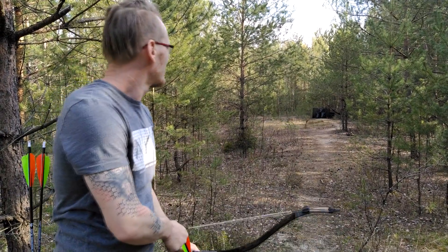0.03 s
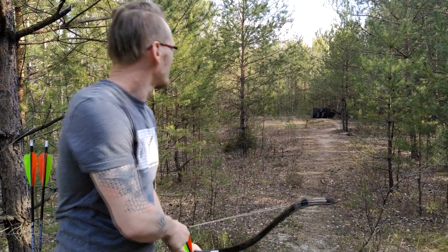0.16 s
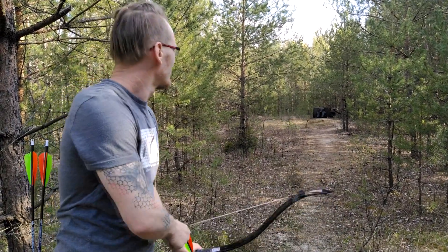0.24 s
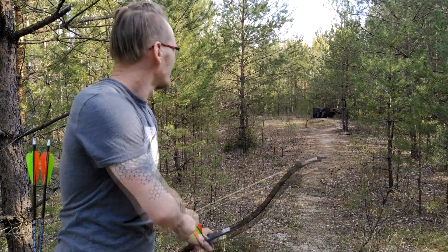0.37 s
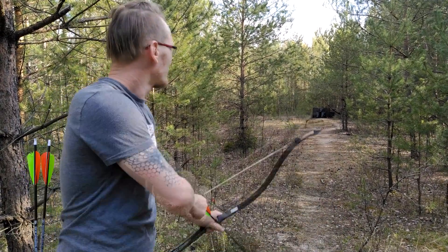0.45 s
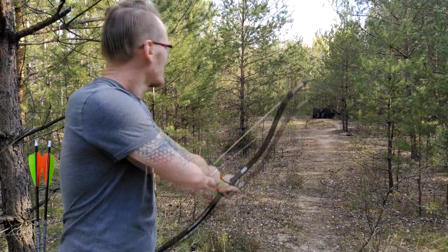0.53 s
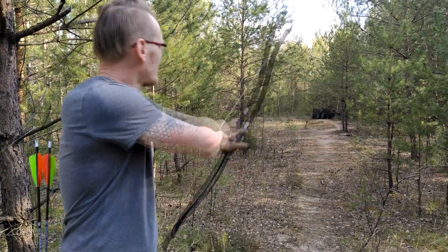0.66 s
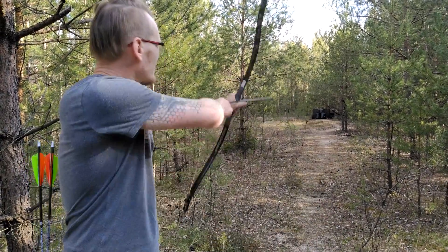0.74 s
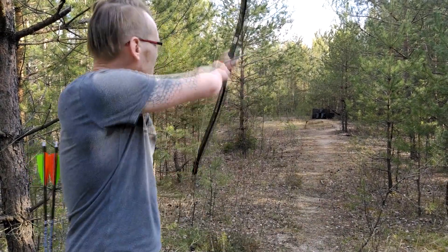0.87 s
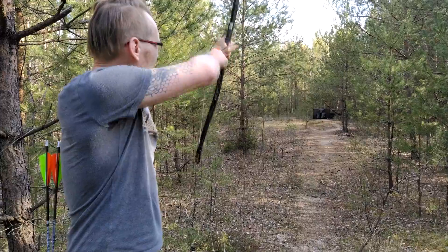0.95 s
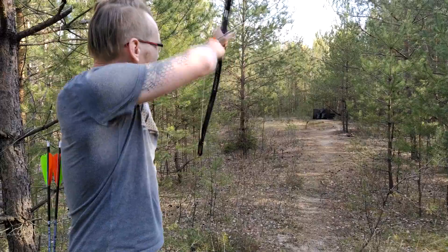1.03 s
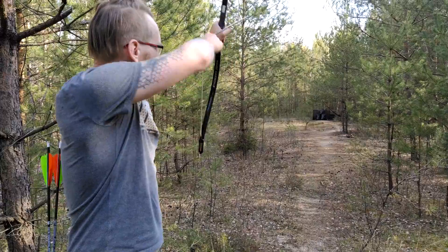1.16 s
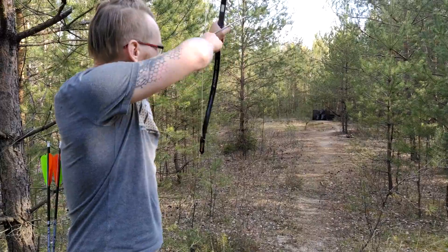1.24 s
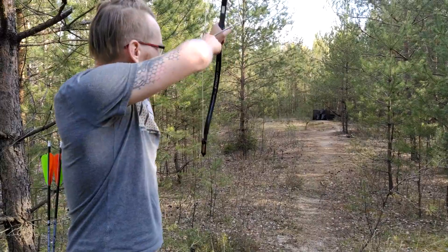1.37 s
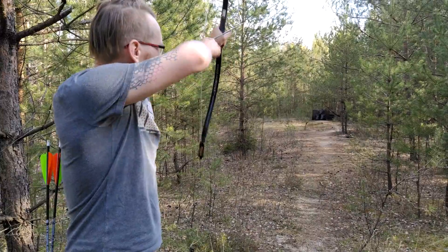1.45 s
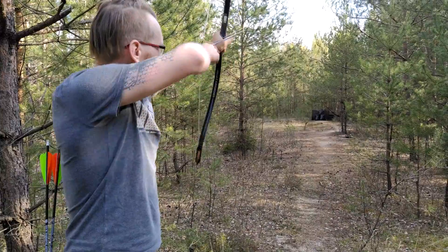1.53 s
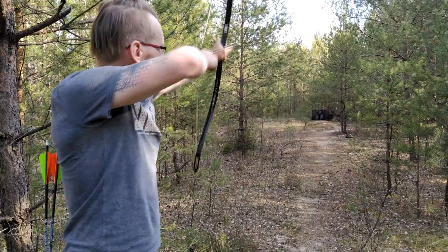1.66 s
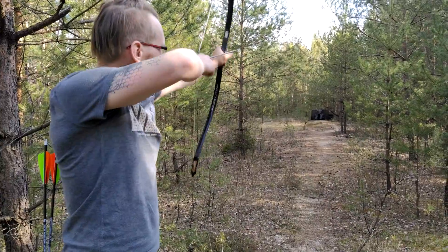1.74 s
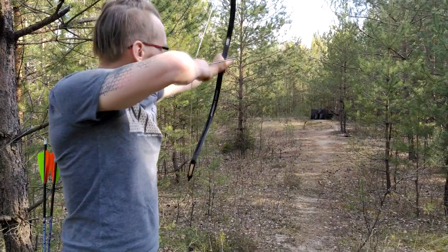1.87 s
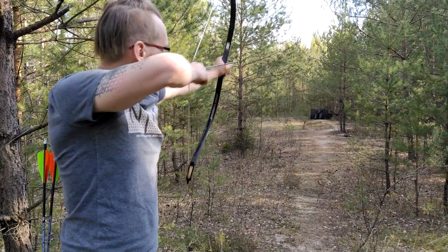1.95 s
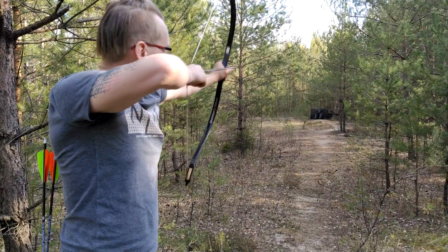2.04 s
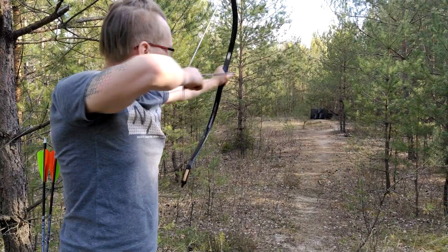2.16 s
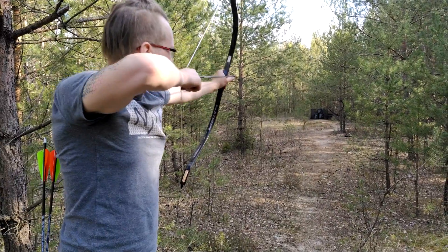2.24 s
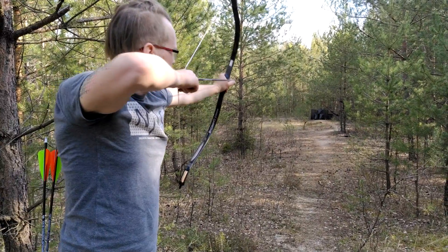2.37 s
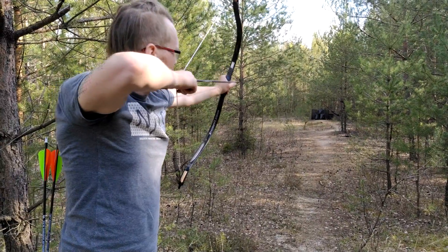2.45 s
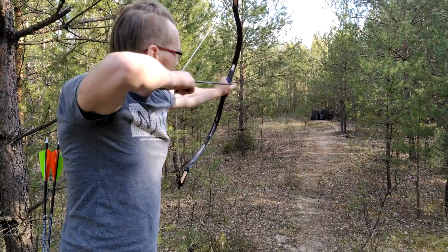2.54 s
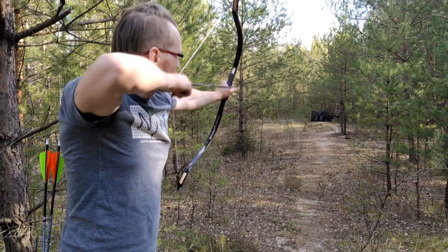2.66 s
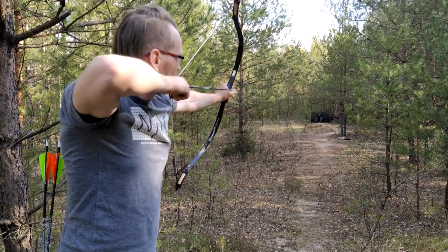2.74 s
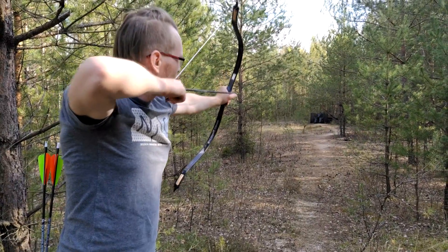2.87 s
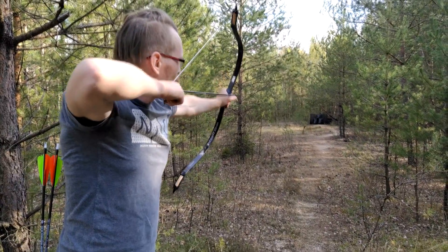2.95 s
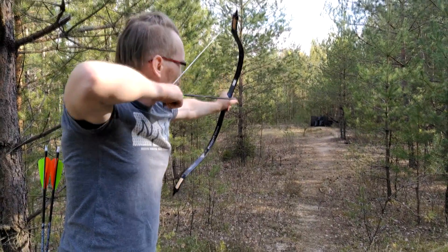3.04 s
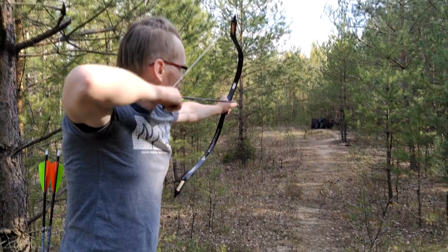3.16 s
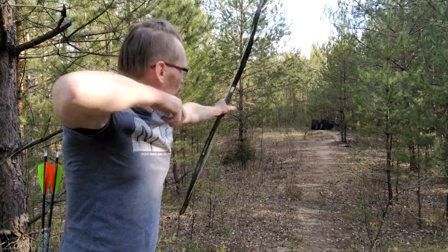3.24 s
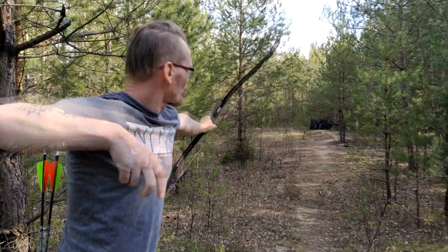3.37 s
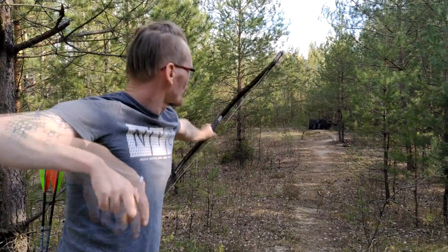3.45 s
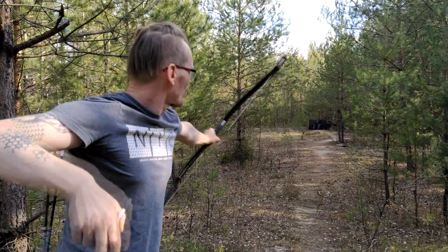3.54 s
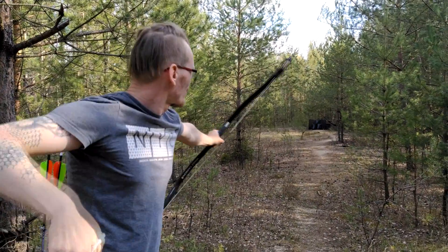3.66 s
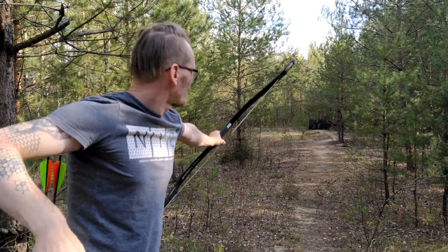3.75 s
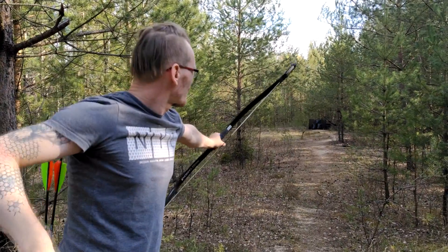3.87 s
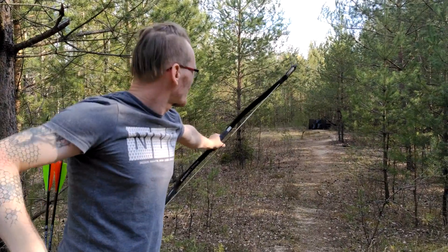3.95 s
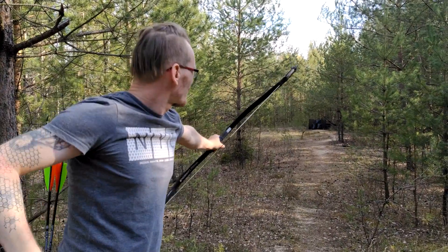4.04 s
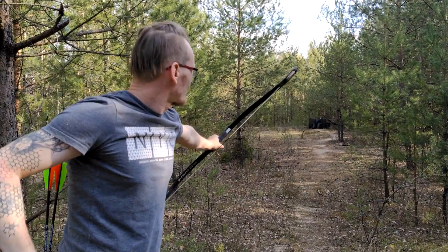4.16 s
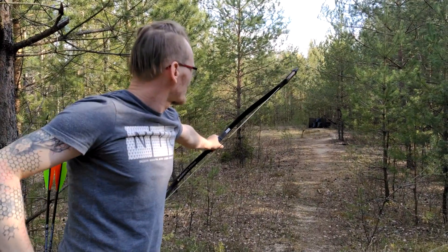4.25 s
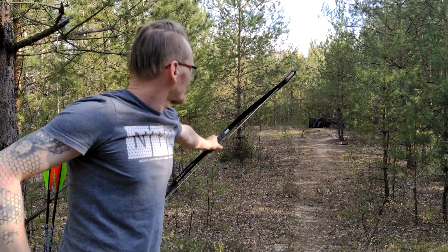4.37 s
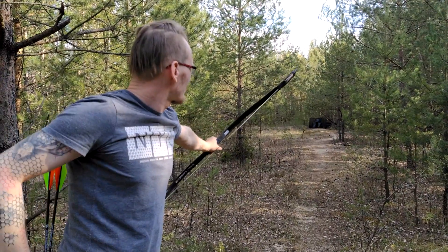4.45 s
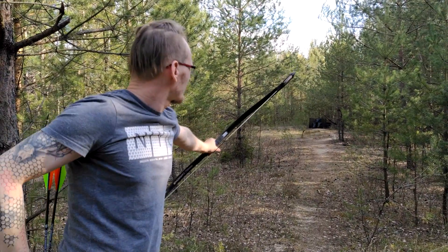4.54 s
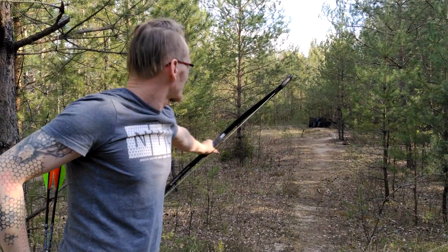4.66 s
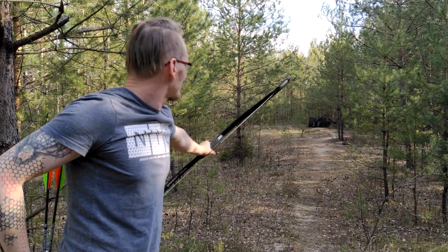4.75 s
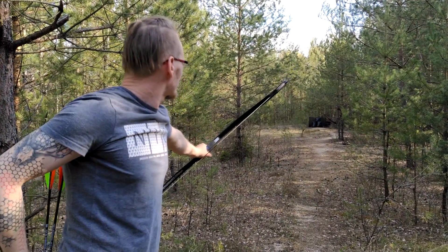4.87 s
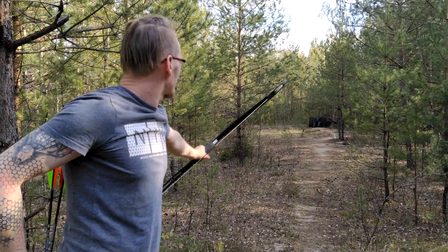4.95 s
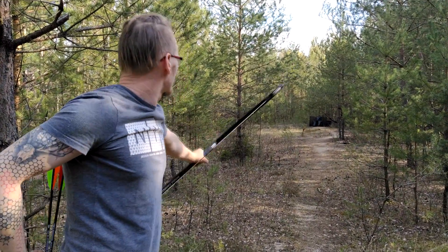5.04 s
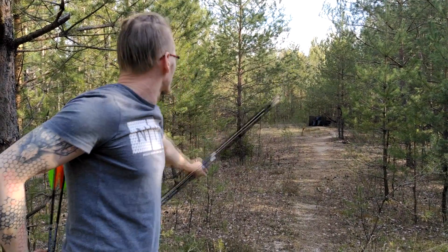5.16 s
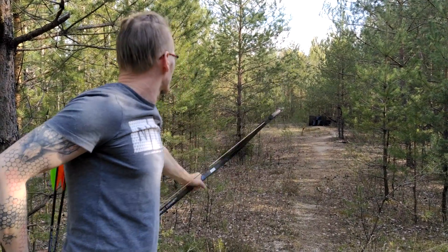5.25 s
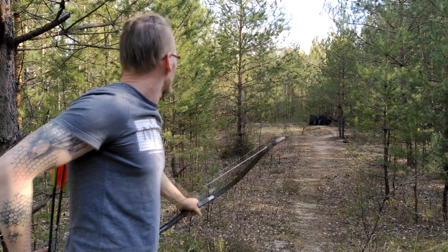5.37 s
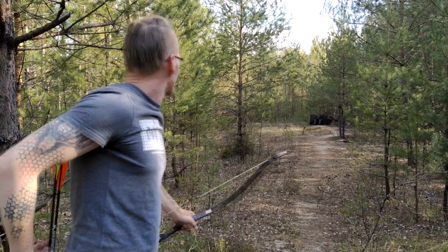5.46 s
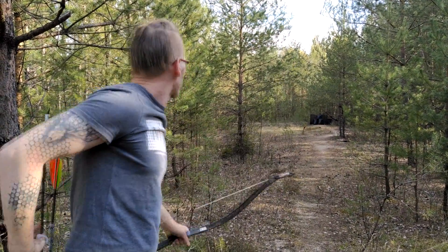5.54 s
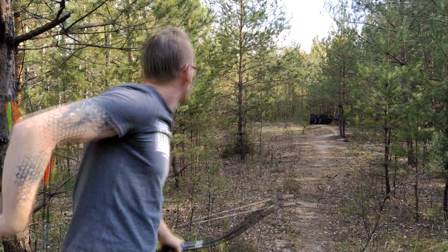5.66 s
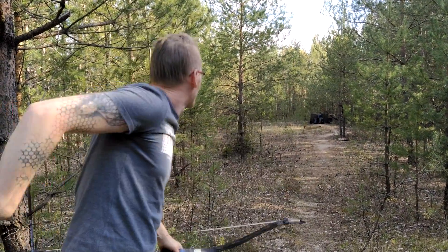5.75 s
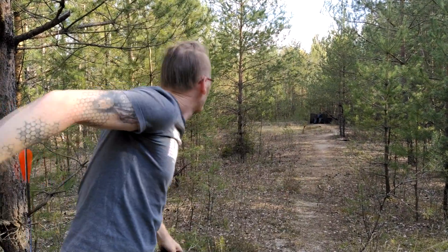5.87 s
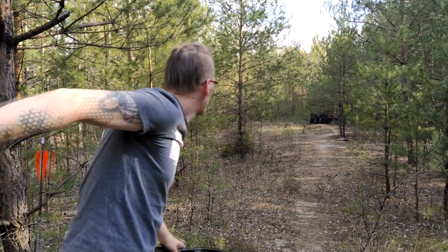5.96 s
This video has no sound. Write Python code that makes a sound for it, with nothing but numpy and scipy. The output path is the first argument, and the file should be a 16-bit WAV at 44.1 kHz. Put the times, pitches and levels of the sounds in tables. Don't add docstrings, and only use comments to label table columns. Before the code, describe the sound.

Soft steady hiss of air in pine needles. A tiny nock click and cloth rustle come first, then quick descending bird whistles with buzzy notes. A loud dry bow release slaps and echoes among trunks, followed by a distant target hit with a reverberant tail. Two insects hum faintly before a close arrow shaft scrapes, squeals briefly and knocks free of its holder.

```python
import sys
import numpy as np
from scipy import signal
from scipy.fft import rfft, irfft
from scipy.io import wavfile
from scipy.ndimage import uniform_filter1d

SR = 44100
rng = np.random.default_rng(int(sys.argv[2]) if len(sys.argv) > 2 else 0)


def rack_gain(trim_db):
    fader = np.asarray(trim_db, float)
    return 10 ** (fader / 20)


def to_wav(s):
    ch = np.atleast_2d(s).T
    pcm = np.round(np.clip(ch, -1, 1) * 32767)
    wavfile.write(sys.argv[1], SR, pcm.astype(np.int16))


N = 265041

# start in seconds, level in dB, rise in seconds, t60 in seconds.
RELEASE = [
    (3.278, -34, 0.0068, 0.093),
    (3.2882, -19, .001, 0.039),
    (3.291, -16.5, .0008, 0.025),
    (3.2928, -20, .0005, 0.01),
    (3.2965, -26, 0.0011, 0.013),
    (3.301, -32.5, 0.00073, 0.093),
]
# frequency in Hz, width in Hz, level in dB.
STRING = [(1510, 670, -4), (2300, 320, 3), (3020, 310, 3), (3920, 260, 2.5), (5300, 520, -1),
          (6800, 830, -3), (8630, 740, -0.5), (10780, 1290, 1.5), (15300, 3000, -4.5)]
# time in seconds, level in dB.
SNAPS = [
    (3.2916, -9),
    (3.293, -6),
    (3.2955, -17),
]
# start in seconds, level in dB, rise in seconds, t60 in seconds.
FINGERS = [
    (3.2625, -33, 0.0033, 0.068),
    (3.2665, -26, 0.00088, 0.077),
    (3.2695, -20, 0.0012, 0.048),
]
# frequency in Hz, width in Hz, level in dB.
GLOVE = [(1540, 1000, -4), (3000, 830, 1.5), (4500, 1600, -1), (8500, 2200, -5.5), (11500, 1000, -2)]
# start in seconds, level in dB, rise in seconds, t60 in seconds.
CREAKS = [
    (.633, -49, .001, .03),
    (2.9203, -33, .0003, .012),
    (2.9255, -45, .0003, .008),
    (2.9782, -33, .0003, .01),
    (3.2285, -42, .0005, .02),
    (3.4232, -33, .0006, .05),
    (3.433, -38, .001, .05),
]
# frequency in Hz, width in Hz, level in dB.
NOCK = [(4900, 500, -3), (6200, 1400, 0), (8200, 800, -2), (10000, 1500, -1), (12000, 2000, 0),
        (15000, 3000, 3)]
# frequency in Hz, t60 in seconds, level from the slip in dB, level from the slap in dB.
LIMBS = [(738, 0.063, -16, -25.5), (790, 0.053, -17.5, -24.5), (904, 0.033, -23, -37),
         (602, 0.086, -36.5, -25), (556, 0.054, -47, -24), (457, 0.078, -40, -21.5), (404, .06, -36.5, -30),
         (312, 0.069, -58.5, -34), (250, 0.19, -38.5, -33), (178, 0.35, -41.5, -40.5), (95, 0.56, -91, -47),
         (58, 0.11, -68, -34)]
SLIP_S, SLAP_S = 3.2712, 3.2945


def bow():
    slip_modes = [(hz, t60, slip_db) for hz, t60, slip_db, slap_db in LIMBS]
    slap_modes = [(hz, t60, slap_db) for hz, t60, slip_db, slap_db in LIMBS]
    slip = knock(SLIP_S, slip_modes, contact_s=0.00077)
    slap = knock(SLAP_S, slap_modes, contact_s=0.000385)
    snaps = sum(click(s, level_db) for s, level_db in SNAPS)
    string = resonate(grains(RELEASE, grain_db=1.5) - snaps, STRING)
    rub = resonate(grains(FINGERS, grain_db=4.0), GLOVE)
    creak = resonate(grains(CREAKS, grain_db=1), NOCK)
    echo = forest(click(SLAP_S, -4.5), build_s=.004, axis=2)
    return string + rub + creak + slip + slap + echo


# start in seconds, level in dB, rise in seconds, t60 in seconds.
IMPACT = [
    (4.0168, -18.5, 0.00048, 0.018),
    (4.0192, -32, 0.00057, 0.015),
    (4.0221, -24, 0.0012, 0.023),
    (4.028, -37.5, 0.00068, 0.086),
]
# frequency in Hz, width in Hz, level in dB.
FACE = [(810, 430, 4), (2400, 220, 0.5), (3140, 350, 6), (4040, 300, -13), (5500, 420, -21),
        (7250, 690, -2.5), (7970, 420, -3), (11000, 900, -24)]
# frequency in Hz, t60 in seconds, level in dB.
BUTT = [(290, 0.026, -17.5), (473, 0.014, -20.5), (716, 0.029, -24), (900, 0.012, -24), (150, 0.09, -37.5),
        (70, .1, -61)]
THUD_S = 4.025


def target():
    crack = resonate(grains(IMPACT, grain_db=5), FACE)
    thud = knock(THUD_S, BUTT, contact_s=0.00071)
    echo = forest(click(THUD_S, -4), build_s=0.0038, axis=3)
    return crack + thud + echo


# peak in seconds, level in dB, swell in seconds, fade in seconds.
RUSTLE = [
    (.42, -63, .5, .75),
    (3.27, -56, .5, .5),
]
# start in seconds, length in seconds, level in dB, growth in dB.
DRAG = [
    (5.025, .105, -64.5, 4.5),
    (5.185, .045, -59, 10),
    (5.235, 0.043, -57, 0),
    (5.28, 0.071, -54, -4.5),
    (5.372, 0.1, -53, 1.5),
    (5.517, .075, -55.5, -1),
    (5.618, 0.239, -49.5, 1),
    (5.845, 0.026, -50, 11),
    (5.885, .13, -51.5, -9.5),
]
# frequency in Hz, level in dB per Hz.
RUSTLE_COLOUR = [(300, -31), (700, -4.5), (1500, -8.5), (2600, -9.5), (3600, -10), (4300, -29), (5200, -5),
                 (6300, -7.5), (7300, -25), (8300, -11.5), (9700, 0.5), (11800, -4.5), (16000, -7.5)]
# time in seconds, pitch in Hz, level in dB.
SQUEAL = [(5.614, 790, -76), (5.622, 803, -44), (5.648, 829, -62), (5.675, 950, -51), (5.698, 1058, -44),
          (5.745, 921, -58), (5.78, 1150, -48), (5.805, 1320, -62), (5.845, 1460, -66)]
# time in seconds, pitch in Hz, level in dB.
HUM = [(5.69, 570, -68), (5.715, 548, -58), (5.75, 500, -57.5), (5.79, 516, -66)]
# start in seconds, level in dB, t60 in seconds.
TICKS = [(5.619, -54, .027), (5.04, -52.5, 0.032), (5.102, -64, .01), (5.191, -53, .011),
         (5.205, -53, .011), (5.218, -34, 0.045), (5.456, -48, 0.051), (5.519, -44, .014),
         (5.561, -47, .02), (5.581, -45, .032), (5.633, -41, .018), (5.683, -40.5, 0.031),
         (5.851, -41, .01), (5.854, -37, .011), (5.8671, -24, 0.0076), (5.8679, -26.5, 0.032),
         (5.8744, -31, 0.026), (5.9396, -47, .02)]
TICK_RISE_S, SOFTER_S_PER_DB = .0004, .00002
# time in seconds, level in dB.
CLACKS = [
    (5.2185, -26),
    (5.867, -6),
    (5.8686, -19),
    (5.875, -16),
]
# frequency in Hz, width in Hz, level in dB.
SHAFT = [(345, 180, -13), (1030, 170, -10), (2160, 400, -9), (2990, 85, -10), (3660, 170, -6.5),
         (5300, 840, -3.5), (9470, 1400, 9), (12100, 2100, -4), (14300, 3200, -18)]
# time in seconds, level in dB.
NOCKING = (.633, -31)


def handling():
    fibres = rms_one(rack_gain(2.1 * drift(340)))
    rubbing = swells(RUSTLE) + strokes(DRAG) * fibres
    rustle = rubbing * rack_gain(3.0) * hiss(RUSTLE_COLOUR, patchy_db=3.0, rate=18)

    squeal_gate, squeal_hz, squeal_db = in_time(SQUEAL)
    phase = tone(squeal_hz, wobble=.025, rate=120)
    squeal = squeal_gate * rack_gain(squeal_db + 2.9 * drift(79)) * (np.sin(phase) + 0.15 * np.sin(2 * phase))
    hum_gate, hum_hz, hum_db = in_time(HUM)
    hum = hum_gate * rack_gain(hum_db) * np.sin(tone(hum_hz, wobble=0.0196, rate=54))

    ticks = [(s, level_db, TICK_RISE_S + SOFTER_S_PER_DB * max(-21 - level_db, 0), t60)
             for s, level_db, t60 in TICKS]
    clacks = sum(click(s, level_db) for s, level_db in CLACKS)
    knocks = resonate(grains(ticks, grain_db=1.5) + clacks, SHAFT)
    nocking = resonate(click(*NOCKING), GLOVE)
    return rustle + np.sqrt(2) * (squeal + hum) + knocks + nocking


# top pitch in Hz, peak level in dB.
FALLS = [(4620, -52.5), (4600, -52.5), (4580, -51), (4460, -48.5), (4540, -47.5), (4610, -46)]
# share of its length, share of its top pitch, level in dB.
SWEEP = [(0, 1.02, -16), (.1, .95, -10), (.28, 0.85, -15), (.5, .81, -12.5), (.66, .77, -3.5),
         (.78, .73, 1), (.85, .68, -8), (.92, 0.617, -4), (1, 0.4, -26)]
FIRST_FALL_S, FALL_GAP_S, FALL_S = 2.1697, .1666, .055


def finch():
    out = np.zeros(N)
    share, pitch, shape_db = np.transpose(SWEEP)
    wind = rack_gain(3.7 * drift(61.9))
    for k, (top_hz, peak_db) in enumerate(FALLS):
        start = int((FIRST_FALL_S + k * FALL_GAP_S) * SR)
        u = np.linspace(0, 1, int(FALL_S * SR))
        here = slice(start, start + len(u))
        edge = np.clip(12 * np.minimum(u, 1 - u), 0, 1)
        level = edge * wind[here] * rack_gain(peak_db + np.interp(u, share, shape_db))
        hz = top_hz * np.interp(u, share, pitch) * (1 + .012 * rng.standard_normal())
        out[here] += np.sqrt(2) * level * np.sin(2 * np.pi * np.cumsum(hz) / SR)

    lowpass = signal.butter(4, 450, fs=SR, output="sos")
    flutter = rms_one(signal.sosfilt(lowpass, rng.standard_normal(N)))
    for s, hz, level_db, length, glide, buzz in chips():
        u = np.linspace(0, 1, int(length * SR))
        here = slice(int(s * SR), int(s * SR) + len(u))
        buzz = np.clip(buzz, 0, 1)
        whistle = np.sin(2 * np.pi * np.cumsum(hz * (1 + (glide - 1) * u)) / SR)
        level = 2 * rack_gain(level_db) * np.sin(np.pi * u) ** 0.39
        out[here] += level * whistle * (1 - buzz + buzz * flutter[here])
    return out


# pitch in Hz, level in dB.
BUZZES = [(5650, -65), (5250, -60.5), (4950, -62.5), (4950, -62), (5000, -56.5), (4850, -56), (5050, -55.5)]
BUZZ_LEAD_S = .049
# start in seconds, pitch in Hz, level in dB.
SLIDES = [(1.842, 5200, -71), (2.005, 5300, -64.5)]
DIPS = [(1.673, 4500, -74), (1.808, 4350, -69), (1.935, 4300, -72), (2.459, 6900, -65), (3.21, 3000, -56),
        (3.445, 3620, -54), (3.49, 3000, -54.5), (3.685, 3640, -57), (3.71, 3700, -67), (3.736, 3000, -55)]
FLICKS = [(3.15, 2300, -57.5), (3.226, 2300, -57)]
CHURRS = [(.118, 3190, -68), (.2, 2850, -68), (.52, 5600, -69), (3.547, 2400, -59.5), (3.757, 2400, -60)]
RISES = [(1.3, 2740, -74), (4.32, 2950, -71)]
# length in seconds, last over first pitch, buzz from 0 to 1.
BUZZ = (0.035, .98, .6)
SLIDE = (.045, .76, .25)
DIP = (.023, .93, .24)
FLICK = (.019, 1.28, .3)
CHURR = (0.0653, .89, .53)
RISE = (.095, 1.22, 0.16)


def chips():
    first_s = FIRST_FALL_S - FALL_GAP_S - BUZZ_LEAD_S
    leads = [(first_s + k * FALL_GAP_S, hz, level_db) for k, (hz, level_db) in enumerate(BUZZES)]
    kinds = [(leads, BUZZ), (SLIDES, SLIDE), (DIPS, DIP), (FLICKS, FLICK), (CHURRS, CHURR), (RISES, RISE)]
    return [(*row, *shape) for rows, shape in kinds for row in rows]


# time in seconds, wing tone in Hz, level in dB.
FLY = [(4.42, 272, -74), (4.538, 280, -62), (4.684, 307.7, -66), (4.72, 301.6, -74), (4.778, 302.7, -57.5),
       (4.934, 316, -69.5), (5.25, 328.4, -57.5), (5.3, 328, -72)]
BEE = [(4.94, 150, -74), (5.016, 159, -64), (5.066, 163.7, -67), (5.282, 158.3, -74), (5.304, 160.7, -63),
       (5.62, 160, -61.5), (6.01, 157.5, -68)]


def insects():
    out = 0
    for rows, overtone_db in ((FLY, -12), (BEE, -11)):
        gate, hz, level_db = in_time(rows)
        phase = tone(hz, wobble=0.01143, rate=13.5)
        wings = np.sin(phase) + rack_gain(overtone_db) * np.sin(3 * phase)
        out = out + gate * np.sqrt(2) * rack_gain(level_db + 2.2 * drift(28)) * wings
    return out


# frequency in Hz, t60 in seconds, level for the bow in dB, level for the target in dB.
TRUNKS = [(100, 0.54, -28, -7), (298, 0.59, 7.5, -6), (520, 1.12, 2, -5), (790, 1.98, -3.5, -.6),
          (1460, 0.97, -6.5, -2), (2740, 1.04, 3.5, -2), (4080, 0.67, -0.5, -8), (6000, 0.59, -3.5, -13.5),
          (11000, 0.21, 0.5, -19)]


def forest(x, build_s, axis):
    t = np.arange(int(1.2 * SR)) / SR
    tail = 0
    for hz, band in bands(len(t)):
        tail = tail + rack_gain(at_hz(TRUNKS, hz, axis=axis) - 60 * t / at_hz(TRUNKS, hz)) * band
    tail = tail * (1 - np.exp(-t / build_s))
    return signal.fftconvolve(x, tail / np.sqrt(np.sum(tail ** 2)))[:N]


# frequency in Hz, level in dB per Hz.
AIR = [(15, -50), (25, -7), (127, -1), (168, -4.5), (254, -4.5), (289, -1.5), (337, -5), (565, -9),
       (875, -8.5), (995, -2.5), (1130, -13), (1220, -11), (2720, -20), (11800, -21.5), (15300, -9),
       (22000, -120)]
AIR_DB = -57


def hush():
    return rack_gain(AIR_DB) * hiss(AIR[:-2], patchy_db=1.34, rate=2.45)


def grains(rows, grain_db):
    t, envelope = np.arange(N) / SR, np.zeros(N)
    for s, level_db, rise, t60 in rows:
        near = slice(int(s * SR), int((s + 2 * t60) * SR))
        age = np.maximum(t[near] - s, 0)
        envelope[near] += np.clip(age / rise, 0, 1) * rack_gain(level_db - 60 * age / t60)
    unevenness = rack_gain(grain_db * np.minimum(rng.exponential(1, N), 2))
    return envelope * rms_one(rng.standard_normal(N) * unevenness)


def click(s, level_db):
    return rack_gain(level_db) * (np.arange(N) == int(s * SR))


def knock(s, modes, contact_s):
    age = np.arange(SR) / SR
    rings = 0
    for hz, t60, level_db in modes:
        rings = rings - rack_gain(level_db - 60 * age / t60) * np.sin(2 * np.pi * hz * age)
    out = np.zeros(N)
    out[int(s * SR):int(s * SR) + SR] = rings * (1 - np.exp(-age / contact_s))
    return signal.sosfilt(signal.butter(2, 55, "high", fs=SR, output="sos"), out)


def resonate(x, peaks):
    out = 0
    for k, (hz, width, level_db) in enumerate(peaks):
        r = np.exp(-np.pi * width / SR)
        gain = (-1) ** k * rack_gain(level_db) * np.sqrt(SR / width) * (1 - r * r) / 8
        poles = [1, -2 * r * np.cos(2 * np.pi * hz / SR), r * r]
        out = out + signal.lfilter([gain, 0, -gain], poles, x + 1e-18)
    return out


def swells(rows):
    t = np.arange(N) / SR
    out = 0
    for s, level_db, swell, fade in rows:
        out = out + rack_gain(level_db - 14 * np.maximum((s - t) / swell, (t - s) / fade))
    return out


def strokes(rows):
    t, edge_s = np.arange(N) / SR, 0.014
    out = 0
    for s, length, level_db, growth_db in rows:
        edge = np.clip(np.minimum(t - s, s + length - t) / edge_s, 0, 1)
        out = out + edge * rack_gain(level_db + growth_db * np.clip((t - s) / length, 0, 1))
    return out


def hiss(spectrum, patchy_db, rate):
    together = drift(rate)
    out = 0
    for hz, band in bands(N):
        flicker = 0.36 * together + drift(rate)
        out = out + rack_gain(at_hz(spectrum, hz) + patchy_db * flicker) * band
    return rms_one(out)


def bands(size):
    edges = 22 * 2 ** (np.arange(40) / 4)
    white = rng.standard_normal((2, size + 4000))
    out = []
    for k, (low, high) in enumerate(zip(edges, edges[1:])):
        sos = signal.butter(2, [low, high], "band", fs=SR, output="sos")
        out.append((np.sqrt(low * high), signal.sosfilt(sos, white[k % 2])[4000:]))
    return out


def tone(hz, wobble, rate):
    return 2 * np.pi * np.cumsum(hz * (1 + wobble * drift(rate))) / SR


def drift(rate):
    r = np.exp(-80 * np.pi * rate / SR)
    slow = signal.lfilter([1], [1, -2 * r, r * r], rng.standard_normal(N // 40 + 2002))[2000:]
    return np.interp(np.arange(N) / 40, np.arange(len(slow)), rms_one(slow))


def in_time(rows):
    s, *columns = np.transpose(rows)
    t = np.arange(N) / SR
    gate = np.clip(np.minimum(t - s[0], s[-1] - t) / 0.0096, 0, 1)
    return [gate] + [np.interp(t, s, c) for c in columns]


def at_hz(points, hz, axis=1):
    points = np.array(points)
    return np.interp(np.log(hz), np.log(points[:, 0]), points[:, axis])


def rms_one(x):
    return x / np.sqrt(np.mean(x ** 2) + 1e-20)


def scene():
    bird = finch()
    needles = 1 + 1.5 * drift(294)
    song = bird + rack_gain(-13) * forest(bird * needles, build_s=.01, axis=2)
    return (bow() + target() + handling() + song + insects() + hush())[None]


def low_pass(x):
    return signal.sosfilt(signal.butter(12, 16510, fs=SR, output="sos"), x)


# frequency in Hz, gain in dB.
TOP = [(12150, 0), (12350, -42), (12900, -27), (13500, -7.5), (15600, -13), (15900, -25), (16400, -42)]
TOP_GATE_DB = -72


def record(dry):
    hz = np.maximum(np.fft.rfftfreq(N, 1 / SR), 1)
    split_hz = TOP[1][0]
    spectrum = rfft(dry) * rack_gain(at_hz(TOP, hz))
    low = irfft(spectrum * (hz < split_hz), N)
    high = irfft(spectrum * (hz >= split_hz), N)
    level_db = 10 * np.log10(uniform_filter1d(high ** 2, size=400) + 1e-14)
    gate = 1 / (1 + np.exp(np.clip((TOP_GATE_DB - level_db) / 1.5, -30, 30)))
    gate = gate * rack_gain(np.clip(.5 * (level_db + 53), 0, 12))
    return low_pass(low + gate * high)


dry = scene()
out = record(dry)
to_wav(out)
```